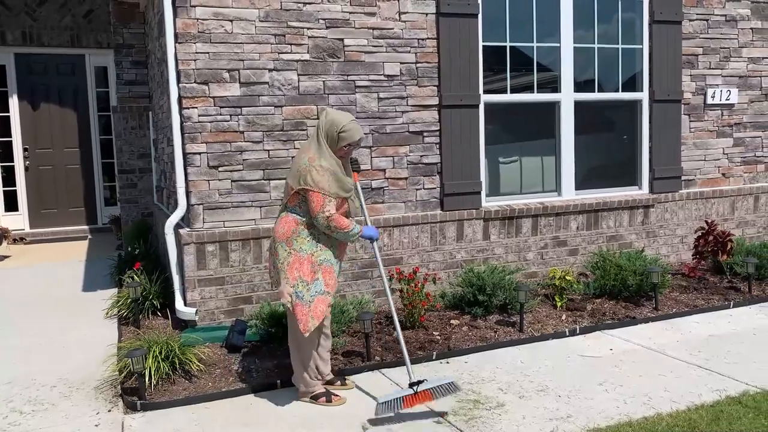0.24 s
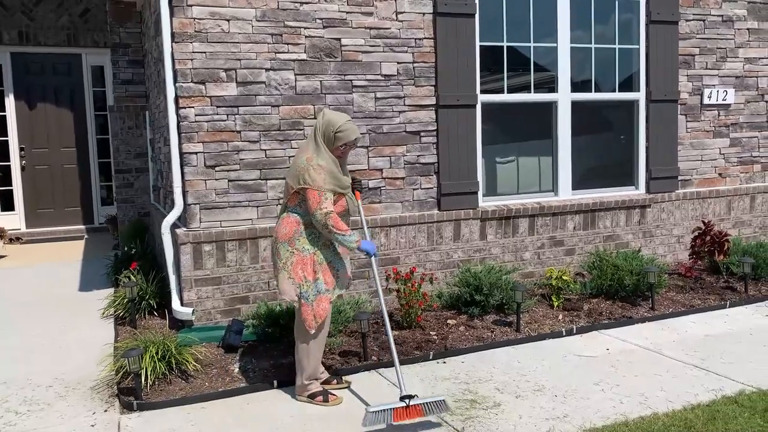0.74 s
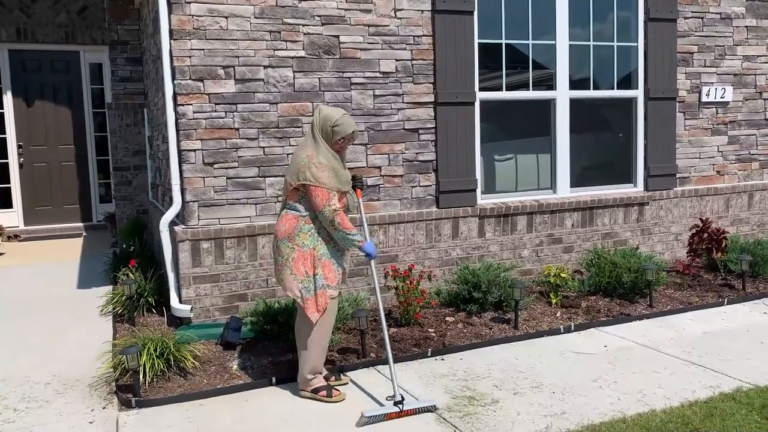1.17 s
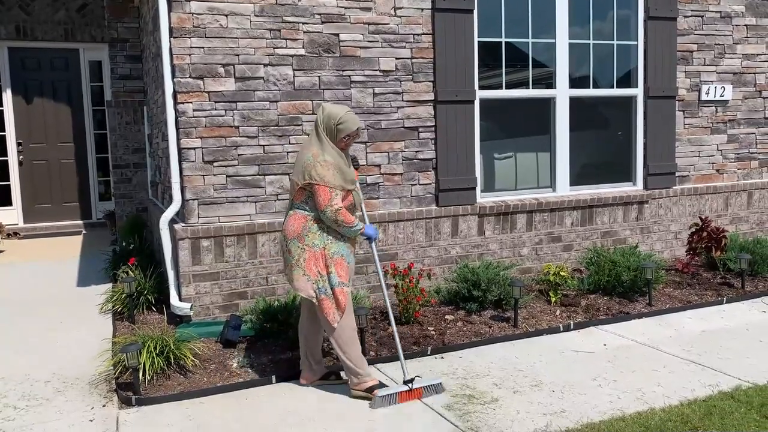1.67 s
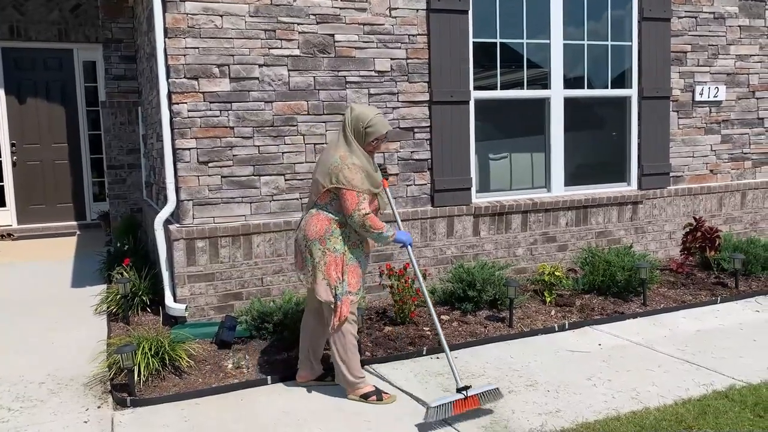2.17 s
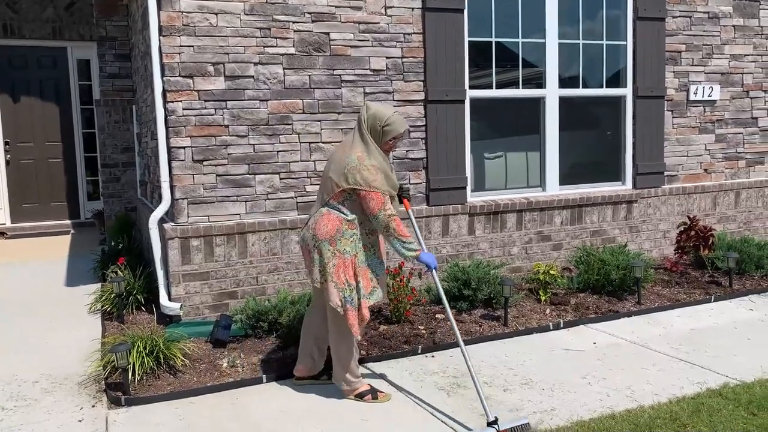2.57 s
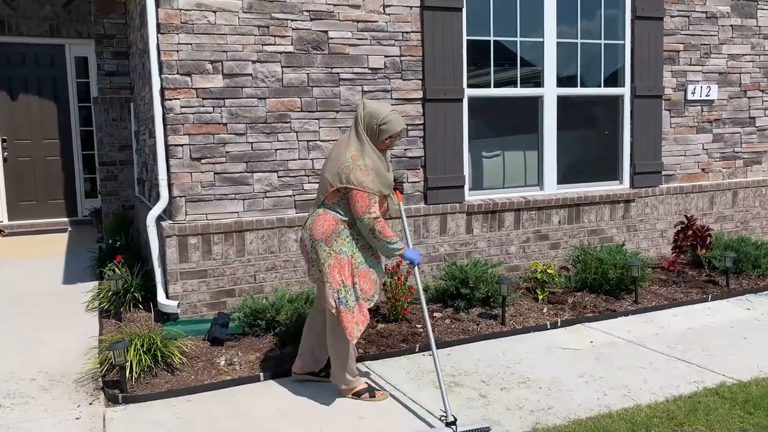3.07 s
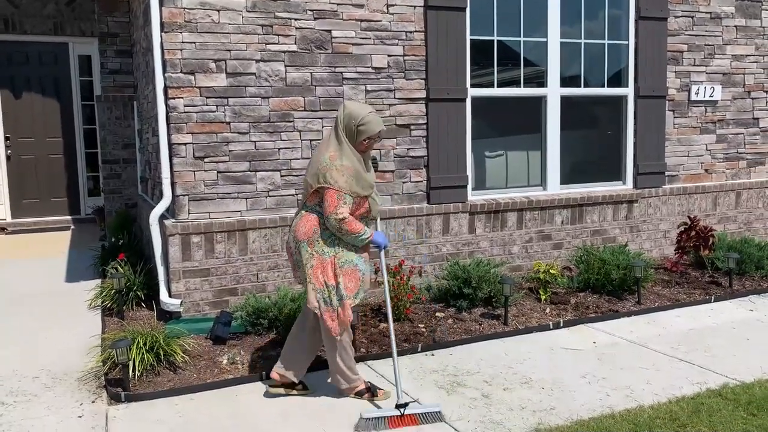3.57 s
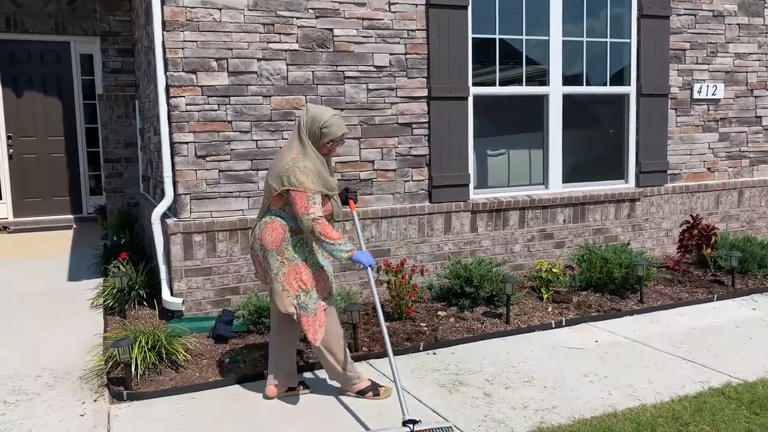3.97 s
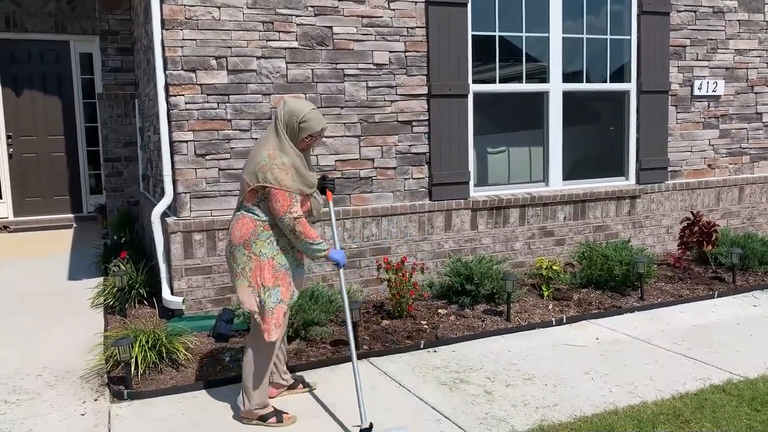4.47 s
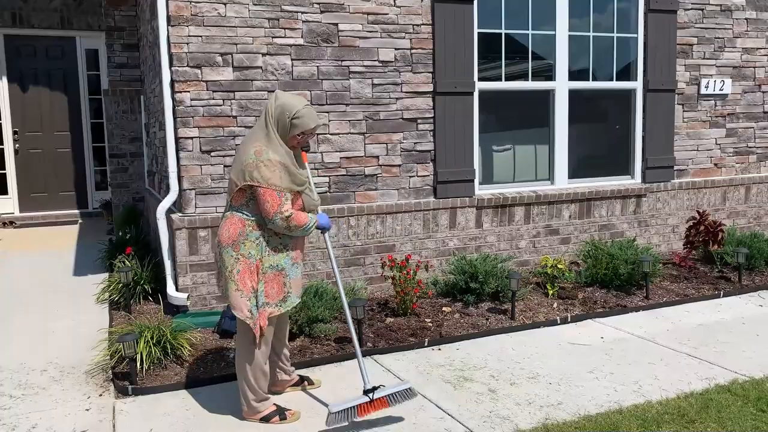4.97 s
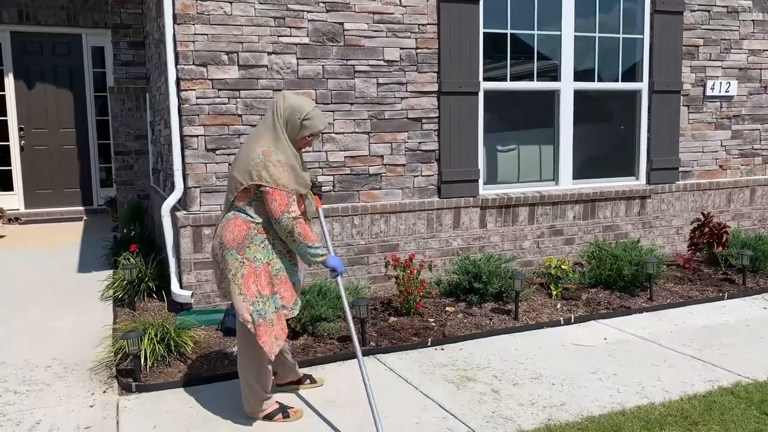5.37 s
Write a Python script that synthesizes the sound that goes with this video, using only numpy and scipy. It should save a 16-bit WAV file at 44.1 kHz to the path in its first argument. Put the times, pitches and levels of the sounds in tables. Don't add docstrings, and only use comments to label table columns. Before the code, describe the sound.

A stiff push broom scrapes bright, scratchy strokes over a concrete walkway outdoors while wind thumps low against the microphone.

```python
import sys
import numpy as np
from scipy import signal
from scipy.fft import rfft, irfft, next_fast_len
from scipy.io import wavfile
from scipy.ndimage import uniform_filter1d

SR = 44100
rng = np.random.default_rng(int(sys.argv[2]) if len(sys.argv) > 2 else 0)


def magnitude_from_level(level_db):
    exponent = np.asarray(level_db, float) / 20
    return 10 ** exponent


def to_wav(s):
    ch = np.atleast_2d(s).T
    pcm = np.round(np.clip(ch, -1, 1) * 32767)
    wavfile.write(sys.argv[1], SR, pcm.astype(np.int16))


N = 248283
T = np.arange(N) / SR
SIZE = next_fast_len(N, True)
HZ = np.fft.rfftfreq(SIZE, 1 / SR)


def evened(x):
    return x / np.sqrt(np.mean(x ** 2) + 1e-20)


def read(points):
    hz, value = np.transpose(points)
    return np.interp(np.log(HZ + 1), np.log(hz + 1), value)


def colour(x, points):
    gain = evened(magnitude_from_level(read(points)))
    return irfft(rfft(x, SIZE) * gain, SIZE)[..., :N]


def noise():
    return rng.standard_normal((2, N))


def spread(pair, same, lean_db=0):
    angle = np.arccos(np.clip(read(same), 0, 1)) / 2
    first, second = rfft(pair, SIZE)
    mid, side = first * np.cos(angle), second * np.sin(angle)
    left = (mid + side) * magnitude_from_level(lean_db / 2)
    right = (mid - side) * magnitude_from_level(-lean_db / 2)
    return irfft([left, right], SIZE)[:, :N]


def drift(size):
    once = uniform_filter1d(rng.standard_normal(N), int(size))
    return evened(uniform_filter1d(once, int(size)))


def slips(per_s, spread_db):
    size = magnitude_from_level(spread_db * np.minimum(rng.exponential(1, (2, N)), 5))
    sign = rng.choice([-1., 1.], (2, N))
    happens = rng.random((2, N)) < per_s / SR
    return evened(size * sign * happens)


# fastest moment in seconds, speeding-up time in seconds,
# slowing-down time in seconds, top level in dB, fall in dB per tenfold drop in speed.
STROKES = [
    (-0.038, .081, .15, -31, 33),
    (.576, .21, .17, -37, 32.5),
    (1.139, 0.12, .214, -36, 23),
    (1.788, .13, 0.33, -35, 86),
    (2.426, .15, 0.13, -35, 20),
    (3.063, 0.15, 0.052, -38.5, 46),
    (3.666, .12, .1, -34.5, 11.5),
    (4.399, 0.16, 0.2, -32.5, 46),
    (5.232, .15, .2, -33.5, 45),
]
# first contact in seconds, resting bristles in dB,
# flung grass in dB, its fading in dB per second, head pressure in dB.
CONTACT = [(-0.3, -43.1, -46, 149, -0.5), (.37, -58, -19.5, 279, -0.4), (.9745, -58.7, -21, 199, -0.6),
           (1.6, -57, -29, 159, 0.6), (2.206, -53.5, -31.5, 157, .7), (2.9005, -44.5, -34, 204, 0.9),
           (3.501, -47, -34, 138, -0.8), (4.147, -56, -27, 174, -1), (5.032, -55, -27.5, 175, 0.1)]
LINGER_DB = [-69.5, -79, -73.5, -72, -72.5, -85, -75, -72, -78]


def push():
    power, pressure_db, linger = np.full(N, 1e-12), np.zeros(N), np.zeros(N)
    for stroke, contact, linger_db in zip(STROKES, CONTACT, LINGER_DB):
        top, rise, fall, top_db, fall_db = stroke
        touch, rest_db, grass_db, fading, head_db = contact
        late = T - top
        away = np.where(late < 0, -late / rise, late / fall)
        speed = np.sin(np.pi / 2 * np.clip(1 - away, 1e-5, 1))
        steepness_db = np.where(late < 0, 31, fall_db)
        power += magnitude_from_level(top_db + steepness_db * np.log10(speed)) ** 2
        grass = magnitude_from_level(grass_db - fading * abs(late) - 69 * late ** 2)
        power += (grass * np.clip(late / 0.082, 0, 1)) ** 2
        settle_db = -10.5 * np.clip(1 - (T - touch) / 0.019, 0, 1)
        power += magnitude_from_level(rest_db + settle_db) ** 2 * (T >= touch) * (late < 0)
        pressure_db = np.where(T >= touch, head_db, pressure_db)
        settling = magnitude_from_level(linger_db - 20 * abs(late)) * (late > 0)
        linger = np.where(T >= touch, settling, linger)
    return 10 * np.log10(power), pressure_db, linger


# frequency in Hz, level in dB.
TIPS = [(4500, -26), (6000, -16), (7800, -6), (8500, -1.5), (10000, 2.5), (12500, -1), (14500, -2),
        (16000, -7)]
# frequency in Hz, level in dB.
HEAD = [(1200, -36), (2000, -8), (2800, 1), (4500, 0.5), (5500, -4.5), (7000, -0.5), (9000, -18)]
# frequency in Hz, level in dB.
DRAG = [(400, -16), (750, -9), (1000, 3), (1400, -11), (1900, 1.5), (2600, -16)]


def scrape():
    speed_db, pressure_db, linger = push()
    head_lag_s, full_db = 0.004, -34
    lagging_db = np.minimum(np.interp(T - head_lag_s, T, speed_db), speed_db + 12) - full_db
    touching = np.clip((speed_db + 78) / 18, 0, 1)
    tips = magnitude_from_level(speed_db + 2.5) + linger * magnitude_from_level(-8)
    head = magnitude_from_level(-45.5 + pressure_db + 0.8 * lagging_db) * touching + linger
    drag = magnitude_from_level(-61.5 + pressure_db + 0.31 * lagging_db) * touching
    rough_concrete = magnitude_from_level(0.62 * drift(51) + 0.56 * drift(610))
    clicks = slips(22000, 1.56) * rough_concrete
    return colour(clicks * tips, TIPS) + colour(clicks * head, HEAD) + colour(clicks * drag, DRAG)


TAP_S = [.370, .408, .9745, .985, .995, 1.600, 1.609, 1.6295, 2.172, 2.208, 2.251, 2.261, 2.9005, 2.911,
         3.502, 3.5125, 3.523, 4.148, 4.1745, 4.185, 4.191, 5.032, 5.0515]
# knock in dB, tip brightness in dB against the knock, length in seconds.
TAPS = [(-44, -4, 0.0099), (-39.5, -5, 0.016), (-41, -9, 0.011), (-39.5, 3.5, 0.0068), (-43.5, 2, 0.0058),
        (-42.5, -10, 0.0076), (-51, -11, 0.0026), (-41, -1, 0.015), (-52.5, -26, 0.0049),
        (-41.5, -17, 0.0062), (-37.5, -7, 0.0086), (-41, -15, 0.0035), (-36.5, -8, 0.0068),
        (-37.5, -13, 0.016), (-38.5, -2, 0.0082), (-36, -1, 0.0068), (-38.5, -7, 0.0066),
        (-48.5, -1, 0.011), (-43.5, 4, 0.0085), (-52, 9, 0.0059), (-51, 10.5, 0.016), (-47, -2, 0.01),
        (-38.5, 2, 0.0082)]
# frequency in Hz, level in dB.
KNOCK = [(400, -22), (800, -5), (1500, -1), (3000, -0.5), (4000, -4), (5800, -7.5), (8000, -7.5)]


def landings():
    low, high = np.zeros((2, N))
    for start, (knock_db, bright_db, length) in zip(TAP_S, TAPS):
        since = np.clip(T - start, 0, None) / max(length, .001)
        shape = (1 - np.exp(-since * 3.5)) * np.exp(-since ** 2)
        low += magnitude_from_level(knock_db) * shape
        high += magnitude_from_level(knock_db + bright_db) * shape
    clicks = slips(20000, 1.8)
    return colour(clicks * low, KNOCK) + colour(clicks * high, TIPS)


# frequency in Hz, likeness from 0 to 1.
BROOM_SAME = [(600, 0.056), (1000, 0.55), (1800, 0.63), (2700, 0.24), (4000, 0.32), (5100, 0.22),
              (6300, 0.36), (8000, 0.81), (16000, 0.85)]
# frequency in Hz, left minus right in dB.
BROOM_LEAN = [(300, 7), (900, 3), (1700, 1), (4000, 0), (5200, -5.5), (6300, -1), (8000, 0.2)]


def broom():
    direct = scrape() + landings()
    slap = magnitude_from_level(-20) * np.roll(direct[::-1], round(.012 * SR), axis=1)
    return spread(direct + slap, BROOM_SAME, read(BROOM_LEAN))


# start in seconds, pitch in Hz, level in dB, time to fall by 60 dB in seconds.
BLOCK = [
    (.986, 770, -51, .06),
    (2.173, 2100, -54, .03),
    (2.903, 1310, -52, .04),
    (3.514, 1040, -43, 0.044),
    (4.176, 1990, -47.5, 0.067),
]


def block():
    out = np.zeros(N)
    for start, hz, db, t60 in BLOCK:
        since = np.clip(T - start, 0, None)
        out += magnitude_from_level(db - 60 * since / t60) * np.sin(2 * np.pi * hz * since)
    return out


# time in seconds, level on the microphone in dB.
GUSTS = [(0.0, -64), (0.42, -55.5), (0.86, -59), (1.57, -57.5), (1.85, -64.5), (2.12, -62.5), (2.35, -57),
         (2.59, -52), (2.74, -53), (3.12, -52), (3.5, -59.5), (3.79, -47), (4.04, -58.5), (4.31, -55),
         (4.89, -61.5), (5.24, -61), (5.49, -60), (5.63, -68)]
# time in seconds, peak in
# dB, frequency in Hz.
BUFFETS = [(2.165, -40.5, 55.7), (2.628, -32.5, 67), (2.783, -37.5, 60), (2.823, -35.5, 87),
           (2.856, -43, 61.4), (2.881, -39, 59), (2.941, -40, 85), (3.009, -36.5, 72.5),
           (3.05, -37.5, 64.7), (3.144, -33, 63.4), (3.191, -28, 66.4), (3.22, -29, 62.5), (3.248, -23, 73),
           (3.777, -33.5, 54),
           (.091, -47, 62), (.148, -48, 80), (0.248, -46.5, 58), (0.392, -49, 82), (.505, -44, 73),
         (.759, -41, 62), (0.911, -46.5, 70), (1.028, -42, 71), (1.341, -42.5, 69), (1.458, -38, 77),
         (1.545, -43, 78), (3.687, -41, 61), (3.873, -37, 83.4), (4.003, -43, 72), (4.283, -40, 86),
         (4.426, -44.5, 84)]
# frequency in Hz, level in dB per Hz.
WIND = [(15, -50), (28, -35), (40, -3.5), (60, -1.5), (76, -1), (94, -9), (150, -13), (260, -30),
        (400, -82)]


def wind():
    lumps = magnitude_from_level(np.interp(T, *np.transpose(GUSTS)) + 1.5 + 2.8 * drift(700) + 1.75 * drift(1900))
    out = colour(noise(), WIND) * lumps * [[1], [.42]]
    for start, peak_db, hz in BUFFETS:
        cycles = (T - start) * hz
        swing = np.cos(2 * np.pi * (cycles + [[0], [.25]]))
        out += magnitude_from_level(peak_db) * np.exp(-(cycles / 0.69) ** 2) * swing * [[1], [.15]]
    return np.array([out[0] + out[1], out[0] - out[1]])


# frequency in Hz, level in dB.
TICK = [(4000, -30), (6000, -16), (9300, -11), (10100, 1), (11000, -5.5), (11700, -10), (12300, 7),
        (12900, -3.5), (13500, 10.5), (14300, -26), (16000, -13)]


def lens_ticks():
    first_s, per_s, stray_s = .0275, 30, 4.1065
    since = (T - first_s) % (1 / per_s)
    since = np.minimum(since, (T - stray_s) % 9)
    frame = ((T - first_s) * per_s + 1).astype(int)
    strength = magnitude_from_level(-59.5 + 0.2 * rng.standard_normal(200))[frame]
    gate = np.clip(since / 0.00017, 0, 1) * np.exp(-(since / 0.003) ** 3)
    return spread(colour(noise() * gate * strength, TICK), [(5000, 0.17), (9000, 0.95)])


# time in seconds, pitch in Hz, level in dB.
WHISTLE = [
    (3.925, 9700, -90),
    (3.949, 9600, -73),
    (3.972, 10400, -70),
    (3.99, 9800, -68),
    (4.015, 11000, -74),
    (4.075, 10600, -82.5),
    (4.095, 9900, -90),
    (4.125, 10200, -71),
    (4.155, 10100, -83),
]
# frequency in Hz, level in dB.
RASP = [(7800, -7), (8600, -23), (9000, 3), (9500, 2), (11500, -15), (12500, 6), (13400, -1), (14000, 0),
        (14600, 2), (16000, -2)]
# time in seconds, level in dB.
RASP_LEVEL = [
    (0.1, -78),
    (.3, -62.5),
    (.4, -64),
    (.5, -110),
]


def insects():
    s, hz, db = np.transpose(WHISTLE)
    cycles = np.cumsum(np.interp(T, s, hz)) / SR
    whistle = magnitude_from_level(np.interp(T, s, db, -120, -120)) * np.sin(2 * np.pi * cycles)
    rasp = colour(rng.standard_normal(N), RASP) * magnitude_from_level(np.interp(T, *np.transpose(RASP_LEVEL)))
    return whistle + rasp


# frequency in Hz, level in dB.
RUSTLE = [(3000, -28), (4500, -1), (6000, -2), (8000, -11), (10000, -29)]


def bushes():
    middle_s, length_s = 4.78, 0.22
    swell = magnitude_from_level(-72.5) * np.exp(-((T - middle_s) / length_s) ** 2)
    return colour(noise() * swell, RUSTLE)


# frequency in Hz, level in dB per Hz.
YARD = [(70, -16), (110, 0), (170, -9.5), (240, -8.5), (380, -15), (520, -19.5), (1000, -22.5),
        (1500, -25.5), (2200, -27), (3000, -33), (3600, -41), (5000, -42), (6000, -48), (8000, -47)]
# frequency in Hz, likeness from 0 to 1.
YARD_SAME = [(100, 1), (300, 0.73), (550, 0.023), (1200, 0.06), (2400, 0.03), (3500, 0.049), (7000, 0.19)]


def yard():
    hum = colour(noise(), YARD) * magnitude_from_level(-55.5 + 1.2 * drift(2700))
    cycles = np.cumsum(589.6 + 5.04 * drift(2510)) / SR
    drone = magnitude_from_level(-77 + 3 * drift(2000)) * np.sin(2 * np.pi * cycles)
    hiss = colour(noise(), [(3000, -33), (7000, -23.0), (12000, 3.5), (16000, 10)]) * magnitude_from_level(-86)
    return spread(hum, YARD_SAME) + drone + spread(hiss, [(7000, 0.17), (9000, 0.34)])


def scene():
    return broom() + block() + wind() + lens_ticks() + insects() + bushes() + yard()


# frames later, weaker by this many dB.
MASKING = [(-1, 26), (0, 0), (1, 5)]


def joint_stereo(x, under_db, masked_db, uneven_db, from_hz, size=5):
    frames = dict(window="cosine", nperseg=2048)
    lead = 624
    sum_and_difference = np.pad([x[0] + x[1], x[0] - x[1]], ((0, 0), (lead, 0)))
    hz, _, z = signal.stft(sum_and_difference, SR, **frames)
    band = np.arange(len(hz)) // size
    power = np.add.reduceat(abs(z) ** 2, np.arange(0, len(hz), size), axis=1)[:, band]
    wide = uniform_filter1d(power, 3 * size, axis=1)
    uneven = evened(uniform_filter1d(rng.standard_normal(z.shape), 2))[:, band]
    mask_db = masked_db + uneven_db * uneven
    treble = power[:, hz > 8000].max((0, 1))
    treble = np.max([np.roll(treble, k) * magnitude_from_level(-2 * db) for k, db in MASKING], axis=0)
    too_weak = (wide < wide[::-1] * magnitude_from_level(-2 * under_db)) & (hz > 8000)[:, None]
    hidden = (power < treble * magnitude_from_level(-2 * mask_db)) & ((hz > from_hz) & (hz < 8000))[:, None]
    kept = z * np.where(too_weak | hidden, .01, 1)
    mid, side = signal.istft(kept, SR, **frames)[1][:, lead:lead + N] / 2
    return np.array([mid + side, mid - side])


def roll_off(x):
    return signal.sosfilt(signal.butter(12, 16300, fs=SR, output="sos"), x)


def record(dry):
    turn = np.exp(1j * np.pi * np.clip(HZ - 6130, 0, None) / 4920)
    edge = magnitude_from_level(-np.clip((HZ - 15850) / 2.7, 0, 45))
    ports = irfft(rfft(dry, SIZE) * [edge / turn, edge * turn], SIZE)[:, :N]
    mix = joint_stereo(ports, under_db=8.5, masked_db=22, uneven_db=6, from_hz=2300)
    return roll_off(mix)


dry = scene()
out = record(dry)
to_wav(out)
```